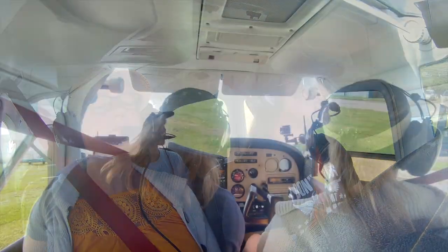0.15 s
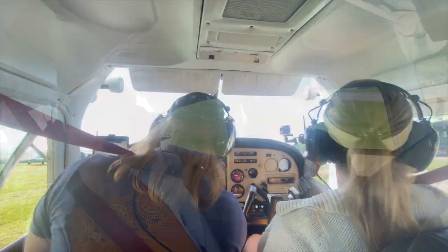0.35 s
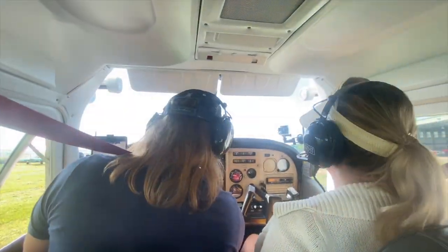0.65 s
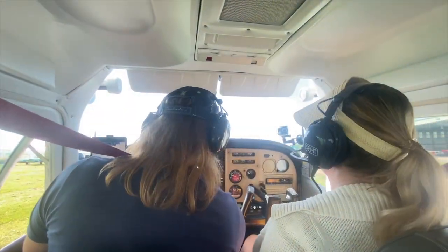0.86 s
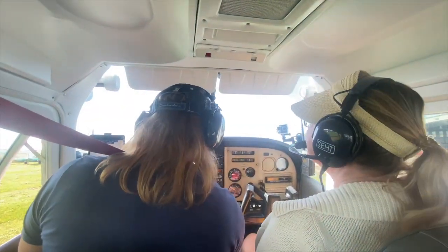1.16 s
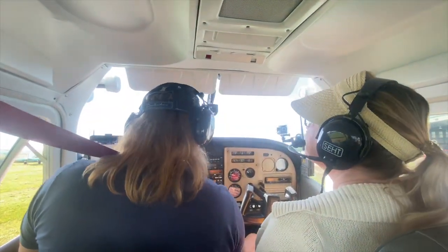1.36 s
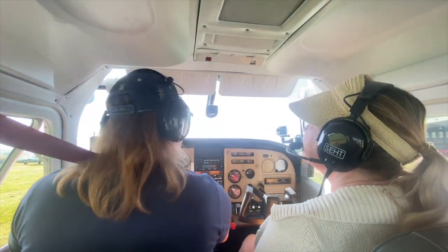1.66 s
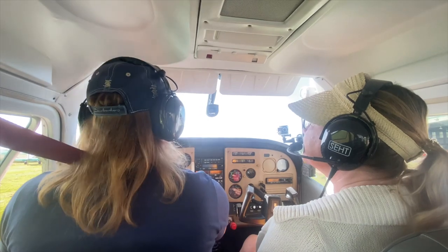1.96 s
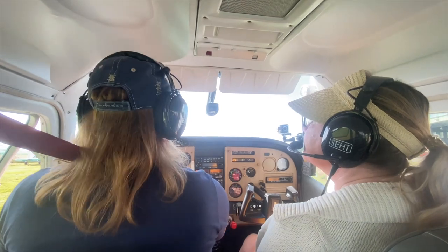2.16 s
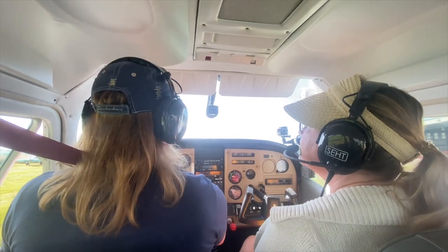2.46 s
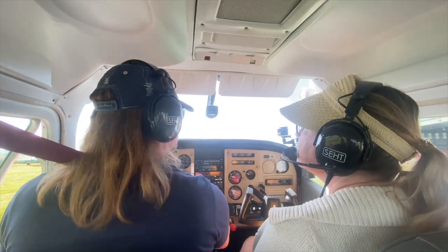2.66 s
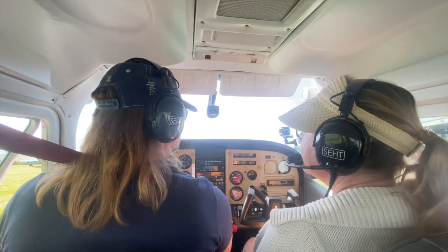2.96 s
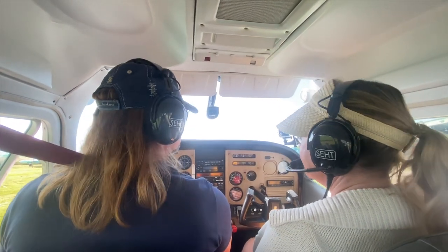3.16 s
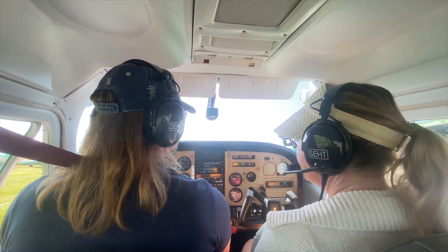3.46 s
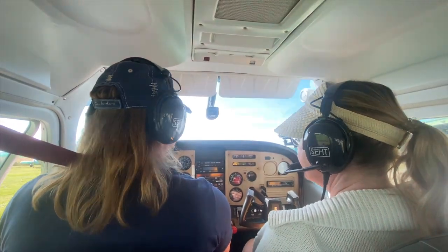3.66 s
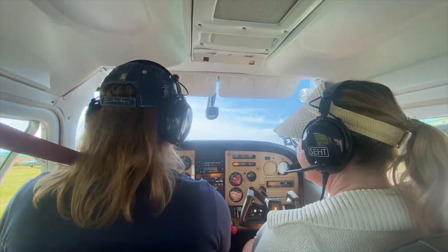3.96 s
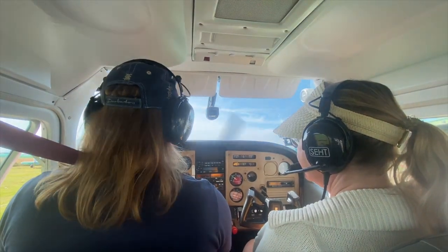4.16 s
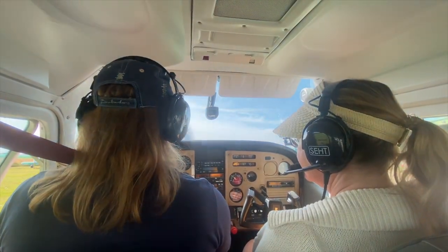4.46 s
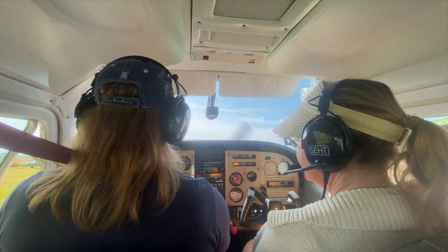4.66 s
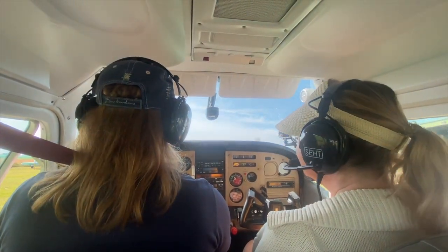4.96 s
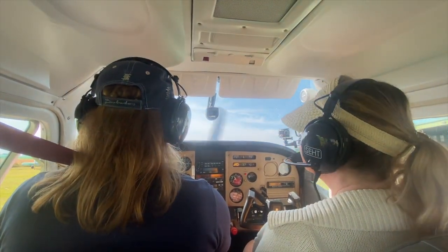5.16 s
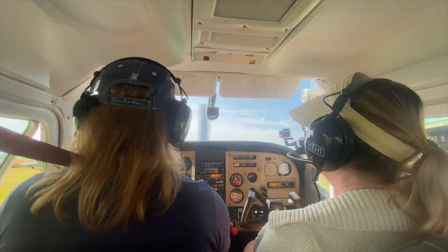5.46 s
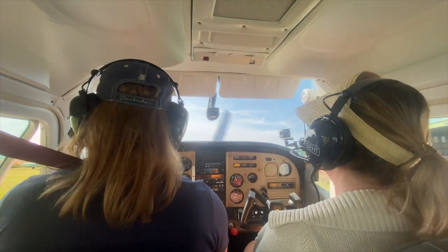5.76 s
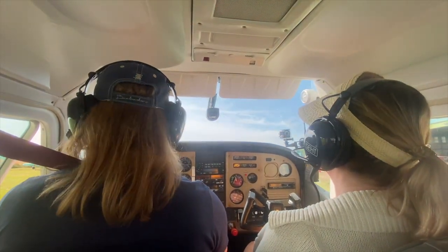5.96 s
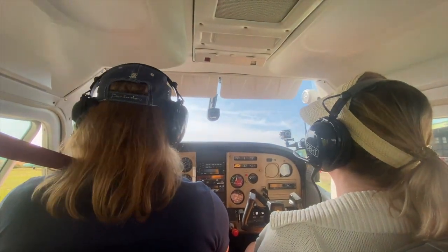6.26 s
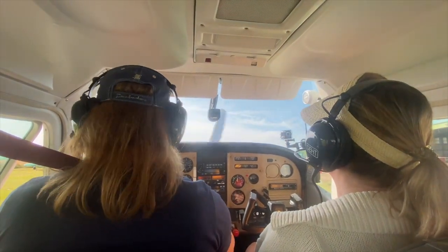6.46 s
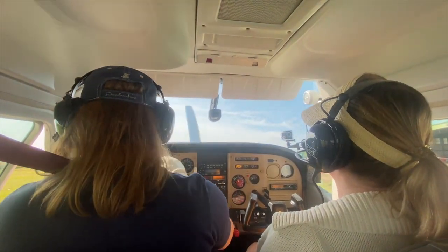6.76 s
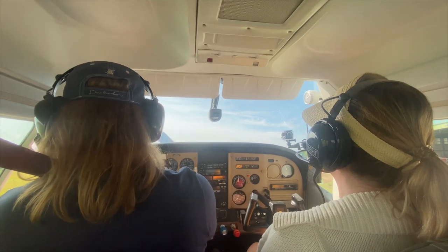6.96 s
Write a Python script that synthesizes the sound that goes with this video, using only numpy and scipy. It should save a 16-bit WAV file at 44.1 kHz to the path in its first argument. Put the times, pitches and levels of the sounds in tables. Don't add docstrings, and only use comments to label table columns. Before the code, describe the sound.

Inside a small aircraft cabin, a six-cylinder piston engine drones low and full, with exhaust buzz and airy roar. After under two seconds its fuel is cut: the pitch slides down, the roar dies and separate chuffs emerge. Linkages click, and the last compressions thump and shake the loose trim until it is almost still. Close stereo microphones at the back, slightly stronger on the left.

```python
import sys
import numpy as np
from scipy import signal
from scipy.io import wavfile
from scipy.ndimage import uniform_filter1d

SR = 44100
rng = np.random.default_rng(int(sys.argv[2]) if len(sys.argv) > 2 else 0)


def invert_db(x):
    u = np.asarray(x, float) / 20
    return 10 ** u


def wrap_up_sound(samples):
    columns = np.atleast_2d(samples).T
    tamed = np.clip(columns, -1, 1)
    steps = np.round(tamed * 32767).astype(np.int16)
    wavfile.write(sys.argv[1], SR, steps)


N = 313551
TIME = np.arange(N) / SR
RUN_HZ = 67.05
SETTLED_S = 2.91
OPENING_DB, OPENING_S = -10.5, 0.2

# start_s, length_s, level_db
KICKS = [
    (5.16, 0.13, -24.5),
    (5.345, 0.065, -22),
    (5.47, 0.14, -22.5),
    (5.66, 0.27, -20),
    (5.91, 0.082, -23.5),
    (6.065, 0.29, -20.5),
    (6.44, 0.025, -26),
    (6.53, 0.045, -28),
    (6.625, 0.022, -31),
    (6.67, 0.077, -29),
]


def in_time(rows):
    s, *columns = np.transpose(rows)
    return [np.interp(TIME, s, c) for c in columns]


def at_hz(points, hz):
    table_hz, values = np.transpose(points)
    return np.interp(np.log(hz), np.log(table_hz), values)


def ramp(start_s, length_s):
    return np.clip((TIME - start_s) / length_s, 0, 1)


def swells(rows, edge_s, sag_db_per_s):
    heights = []
    for s, length_s, db in rows:
        sagging = invert_db(db - sag_db_per_s * (TIME - s))
        heights.append(sagging * ramp(s - edge_s, edge_s) * (1 - ramp(s + length_s, edge_s)))
    return np.max(heights, axis=0)


def rms_one(x):
    return x / np.sqrt(np.mean(x ** 2) + 1e-20)


def drift(rate_hz):
    r = np.exp(-80 * np.pi * rate_hz / SR)
    slow = signal.lfilter([1], [1, -2 * r, r * r], rng.standard_normal(N // 40 + 2002))[2000:]
    return np.interp(np.arange(N) / 40, np.arange(len(slow)), rms_one(slow))


def resonance(x, hz, width_hz):
    r = np.exp(-np.pi * max(width_hz, .5) / SR)
    zeros = np.array([1, 0, -1]) * (1 - r * r) / 2
    return signal.lfilter(zeros, [1, -2 * r * np.cos(2 * np.pi * hz / SR), r * r], x)


def pair(near, far, hz):
    # pitch_hz, level_db
    left_db = [(60, -1), (110, -.5), (200, 1), (380, -.5), (600, 3), (790, 2.5), (810, 9), (880, 9),
               (930, 2.5), (1000, 2), (1250, 3), (1580, 2.5), (2200, 1.2), (3200, 2.5), (5000, 1),
               (8120, -3), (15000, -2)]
    # pitch_hz, delay_samples
    lag = [(100, 20), (160, 6), (250, 10), (320, 20), (800, 19), (875, 26), (940, 43), (1000, 34),
           (1080, 35), (1145, 37), (1200, 13), (1280, 8), (1350, 12), (1550, 14), (1700, 16), (2000, 15),
           (2500, 17), (6500, 19), (7500, 0)]
    tilt = invert_db(at_hz(left_db, hz) / 2)
    return np.array([near * tilt, np.roll(far, round(at_hz(lag, hz))) / tilt])


def speed():
    # time_s, firing_hz
    firing = [(1.65, 67.05), (1.8, 64.2), (2.0, 59.7), (2.2, 55.1), (2.4, 50.8), (2.6, 46.8), (2.8, 43.8),
              (3.0, 41.0), (3.2, 38.7), (3.4, 36.4), (3.8, 31.4), (4.2, 26.8), (4.6, 22.85), (5.0, 19.4),
              (5.5, 15.5), (7.2, 4.5)]
    return uniform_filter1d(in_time(firing)[0], size=6000, mode="nearest")


def pressure_pulses(firing_hz, phase):
    # pitch_hz, level_db
    cabin = [(28, -23.5), (62, -1), (75, -1.5), (90, 2), (110, -9), (126, -8), (165, -24.5), (270, -22)]
    # pitch_hz, turn_rad
    cabin_turn = [(82, 0), (108, 2.1), (140, 2.8)]
    # burning_db, starving_db, settled_db
    orders = [
        (-3.5, 1, -10),
        (2.5, 0.05, 0),
        (5, -6, 4),
        (-14.5, -4, -1.5),
        (-32, -15, -3),
    ]
    suction_turn_rad = -2.1
    starved, settled = ramp(1.83 - .04, .08), ramp(SETTLED_S - .05, .1)
    misfire_db = -7 * np.exp(-((TIME - 1.856) / 0.055) ** 2)
    pulse_db = -9 + 10 * np.log2(firing_hz / RUN_HZ) + misfire_db + OPENING_DB * np.exp(-TIME / OPENING_S)
    out = 0
    for k, (burning_db, starving_db, settled_db) in enumerate(orders, 1):
        state_db = burning_db + (starving_db - burning_db) * starved + (settled_db - starving_db) * settled
        level_db = pulse_db + at_hz(cabin, k * firing_hz) + state_db
        turn = settled * at_hz(cabin_turn, k * firing_hz) + (k == 1) * suction_turn_rad * starved
        out = out + invert_db(level_db + 4.5 + 0.6 * drift(45.0)) * np.cos(k * (phase + np.pi / 2) + turn)
    return out


def uneven_cylinders(burn_db, phase):
    # order_of_crank, level_db
    uneven = [(1, -48), (2, -36), (4, -32), (5, -30), (7, -28), (8, -40), (10, -42), (11, -42)]
    return sum(invert_db(burn_db - burn_db[SR] + db + 3 + 2 * drift(4.0)) * np.cos(k * phase / 3 + 6 * rng.random())
               for k, db in uneven)


def pumping(firing_hz, phase):
    # pitch_hz, level_db
    coast = [(60, -14), (100, -1), (135, -8), (165, -22), (200, -20), (230, -10), (265, -18), (400, -30)]
    pumping_db = np.interp(TIME, [1.7, 2.2, 3.3, 4.2, 5.0], [-54, -28, -17.5, -46.0, -21.5])
    out = 0
    for k in range(6, 13):
        level_db = pumping_db + at_hz(coast, k * firing_hz) - 1.27 * k + 3.7 * drift(7.0)
        out = out + invert_db(level_db) * np.cos(k * (phase + np.pi / 2))
    return out


def exhaust(burn_db, firing_hz, phase):
    # multiple_of_firing, level_db
    pipe = [(5, -39), (6, -38), (7, -37), (8, -39), (8.7, -27), (9, -37), (10, -35), (11, -35), (12, -36),
            (12.5, -38), (13, -36), (14, -36), (15, -38), (16, -35), (16.3, -30), (17, -37), (18, -31),
            (19, -34), (20, -39), (21, -38), (22, -43), (23, -45), (24, -40), (26, -45)]
    starves_db = np.interp(TIME, [1.65, 1.85, 2.1, 2.6], [-2.0, -1.0, -3.5, -7.5]) + 1.6 * drift(3.5)
    out = 0
    for k in range(5, 27):
        colour_db = at_hz(pipe, k * firing_hz / RUN_HZ)
        opening_cut_db = 10 * (k < 12 and k != 10) + 7 * (16 < k < 23) - 6 * (k > 22)
        level_db = burn_db - burn_db[SR] + starves_db + colour_db + 5.2 + 2.2 * drift(9.0)
        level = invert_db(level_db - opening_cut_db * np.exp(-TIME / .3))
        start = (.45 if k > 13 else 1.6) * rng.standard_normal()
        turn = .15 * rng.standard_normal()
        out = out + pair(level * np.cos(k * phase + start), level * np.cos(k * phase + start + turn), 67 * k)
    return out


def engine(burn_db, firing_hz, phase):
    low = pressure_pulses(firing_hz, phase) + uneven_cylinders(burn_db, phase) + pumping(firing_hz, phase)
    low = -low * np.clip((5.5 - TIME) / .3, 0, 1)
    sway = -0.02 + 0.016 * drift(2.4)
    return pair(low * (1 + sway), low * (1 - sway), 100) + exhaust(burn_db, firing_hz, phase)


def shudder(opening_db):
    # pitch_hz, width_hz, level_db
    modes = [(34, 16, -12), (63.8, 4.4, 3), (82.3, 5.6, 1), (85.3, 22, -1), (122.8, 12.4, -6.5),
             (139.4, 24.4, -12.5)]
    # time_s, level_db
    shake = [(1.9, -18), (2.2, -25), (3.6, -28), (4.9, -30), (5.3, -35), (6.4, -35), (7.1, -38)]
    # start_s, length_s, level_db
    lurches = [
        (1.63, 0.21, -14.5),
        (2.74, 0.74, -15.5),
    ]
    (level_db,), white = in_time(shake), rng.standard_normal((2, N))
    booms = sum((-1) ** k * invert_db(db) * resonance(white, hz, width) for k, (hz, width, db) in enumerate(modes))
    booms = signal.sosfilt(signal.butter(2, [20, 150], "band", fs=SR, output="sos"), booms)
    booms = booms / uniform_filter1d(booms ** 2, size=3500) ** .3
    jolts = np.maximum(swells(lurches, 0.095, 3), swells(KICKS, 0.049, 12))
    mid, side = np.maximum(invert_db(level_db + opening_db), jolts) * rms_one(booms)
    return pair(mid + .26 * side, mid - .26 * side, 70)


def chuffs(phase):
    firing = np.floor(phase / (2 * np.pi) + .5).astype(int)
    chuff = np.exp(2.5 * np.cos(phase)) * invert_db(1.4 * rng.standard_normal(600)[firing])
    return (chuff / chuff.mean() - 1) * .7


def trim_rustle():
    # time_s, level_db
    rustle = [
        (2.6, -41),
        (3.5, -66),
        (5.05, -43),
        (5.2, -38.5),
        (6.5, -39.5),
        (6.84, -40.5),
        (6.92, -50),
    ]
    kicks = uniform_filter1d(swells(KICKS, 0.12, 4.4), size=1500) / invert_db(-17.5)
    kick_share = 0.4
    return in_time(rustle)[0] + 20 * kick_share * np.log10(kicks + 0.32) * ramp(4.86, .15)


def trim_crackle():
    per_s, decay_s, level_db = 110, .004, 1.0
    ticks = (rng.random(N) < per_s / SR) * np.minimum(rng.exponential(1, N), 2.5)
    return invert_db(level_db) * signal.lfilter([1], [1, -np.exp(-1 / (decay_s * SR))], ticks + 1e-18)


def click_bursts(hz):
    # start_s, peak_db, ring_hz, bright_share_db
    clicks = [(2.6304, -32.5, 1800, -8.5), (3.352, -25.5, 1660, -29), (4.2654, -52, 1420, -8),
              (4.603, -21, 1780, -33), (4.612, -37, 1500, -40), (4.815, -38.5, 1900, -40),
              (4.7804, -48, 1790, -24), (4.879, -29, 1510, -37), (4.895, -37, 1100, -40),
              (5.124, -36, 5000, -8), (5.202, -31.5, 2500, -23), (5.300, -37, 4000, -15),
              (5.3284, -35, 5000, -10), (5.406, -24.5, 1840, -16), (5.519, -42, 2500, -20),
              (5.6306, -41, 4000, -10), (5.754, -27, 2500, -15), (5.762, -38, 1500, -25),
              (5.822, -26, 2800, -14), (5.829, -34, 2000, -25), (5.838, -34, 1200, -30),
              (5.885, -31, 2500, -20), (5.9634, -36, 4200, -26), (6.0034, -42, 5000, -3),
              (6.052, -35, 3000, -10.5), (6.0934, -38.5, 4500, -8), (6.153, -34, 2460, -22),
              (6.167, -35, 3000, -21), (6.319, -32, 4500, -11), (6.395, -43, 4000, -13),
              (6.482, -27.5, 4040, -15.5), (6.553, -32.5, 4200, -16), (6.631, -33.5, 4200, -9.5),
              (6.675, -35, 1700, -16), (6.706, -45, 5000, -8), (6.816, -33.5, 4198, -12),
              (6.83, -37.5, 3850, -14), (6.94, -41, 1900, -28), (6.984, -31, 3820, -14),
              (7.0614, -38, 2400, -16)]
    s, peak_db, ring_hz, bright_db = np.transpose(clicks)
    lift_db = 7.5 * np.exp(-(np.log2(hz / ring_hz) / 0.52) ** 2)
    part_db = 8.5 + bright_db if hz > 6500 else -13 + lift_db
    hits = np.full(N, 1e-18)
    hits[(s * SR).astype(int)] = invert_db(peak_db + part_db)
    hits = uniform_filter1d(hits, size=130, origin=-64)
    power = 0
    for db, t60_s in ((0, .05), (-15, 0.17)):
        ringing = signal.lfilter([1], [1, -invert_db(-60 / (t60_s * SR))], hits)
        power = power + (invert_db(db) * ringing) ** 2
    return power


def noises(burn_db, air_db, trim_db, phase):
    # pitch_hz, density_db
    roar = [(140, 1), (200, -8), (300, -4), (380, -8.5), (500, -9), (630, -14), (790, -9), (950, -8),
            (1300, -8), (1550, -4), (2000, -14), (2500, -19.5), (3200, -18.5), (6500, -26.5), (10300, -31),
            (12500, -40)]
    # pitch_hz, density_db
    airflow = [(140, -2.5), (200, -9.5), (280, -10), (380, -8.5), (500, -3.5), (620, -5), (800, -9.5),
               (1250, -13), (1550, -10.5), (2300, -28.5), (3200, -25), (6500, -40.5), (10000, -35.5),
               (12500, -50)]
    # pitch_hz, density_db
    trim = [(140, 4.5), (220, 1), (420, -3), (800, -7.5), (1100, -10.5), (1700, -12.5), (2600, -22),
            (3500, -25.5), (4800, -26), (6500, -38), (9500, -34), (12500, -50)]
    # pitch_hz, density_db
    crack = [(140, 10), (500, 13), (1100, 10.5), (1600, 13.5), (2400, -2), (3500, 3.5), (6000, -9),
             (12500, -15)]
    # pitch_hz, depth_0_1
    burning_throb = [(140, 0.2), (600, 0.05), (1000, 0.22), (1500, 0.25), (2000, 0.27), (3200, 0.24),
                     (5000, 0.06), (12500, 0.15)]
    # pitch_hz, depth_0_1
    coast_throb = [(140, 0.15), (700, 0.08), (1000, 0.4), (1400, 0.4), (2000, 0.13), (5000, 0.09),
                   (12500, 0.09)]
    # pitch_hz, share_0_1
    likeness = [(140, .78), (250, .62), (450, .72), (650, .55), (800, .75), (1000, .5), (1250, .55),
                (1600, .88), (2000, .75), (2500, .45), (3500, .5), (6500, .42), (9000, .6), (12500, .6)]
    beat, crackle = chuffs(phase), trim_crackle()
    lumps = invert_db(2 * (1.0 * drift(14.0) + 1.2 * drift(60.0)))
    burn_power, air_power, trim_power = invert_db(2 * burn_db), invert_db(2 * air_db), invert_db(2 * trim_db) * lumps
    unfuelled = ramp(1.70, 0.66)
    throb_share = (1 - 0.4 * ramp(SETTLED_S, 0.6)) * (1 + .7 * np.exp(-TIME / 0.36))
    edges_hz = 140 * 2 ** np.arange(0, 6.7, 1 / 3)
    white, out = rng.standard_normal((2, 2, N)), 0
    for k, (low, high) in enumerate(zip(edges_hz, edges_hz[1:])):
        hz = np.sqrt(low * high)
        band = signal.butter(2, [low, high], "band", fs=SR, output="sos")
        mid, side = signal.sosfilt(band, white[k % 2])
        steady = burn_power * invert_db(2 * (at_hz(roar, hz) + 21.5))
        steady = steady + air_power * invert_db(2 * (at_hz(airflow, hz) + 21.5))
        patchy_db = 1.5 * drift(15.0)
        trim_colour = invert_db(2 * (at_hz(trim, hz) + 21.5 + patchy_db))
        steady = steady + trim_power * (0.82 + crackle * (hz > 900)) * trim_colour
        clicks = click_bursts(hz) * invert_db(2 * at_hz(crack, hz))
        burning, coasting = at_hz(burning_throb, hz), at_hz(coast_throb, hz)
        depth = (burning + (coasting - burning) * unfuelled) * throb_share
        throb = np.maximum(1 + depth * beat * (TIME < 5.4), .1)
        gain = np.sqrt(steady * throb ** 2 * invert_db(2 * 0.84 * drift(11.4)) + 10.2 * clicks)
        alike = np.clip(at_hz(likeness, hz), 0, 1) * (1 - .55 * (hz > 380) * ramp(5.15, 0.26))
        shared, own = np.sqrt((1 + alike) / 2) * mid, np.sqrt((1 - alike) / 2) * side
        out = out + pair(gain * (shared + own), gain * (shared - own), hz)
    return signal.sosfilt(signal.cheby2(16, 60, 12800, fs=SR, output="sos"), out)


def top_hiss(burn_db):
    level = invert_db(burn_db - 20 + 3.0 * drift(9.8)) + invert_db(-22.0) * np.sqrt(click_bursts(9000))
    air = rng.standard_normal(N) * level
    band = signal.butter(4, [14450, 15250], "band", fs=SR, output="sos")
    return signal.sosfilt(band, [air, np.roll(air, 1)])


def whines(air_db):
    # pitch_hz, width_hz, level_db, start_s, stop_s, share_of_airflow_fall
    tones = [
        (622, 40, -42, 0.1, 5.3, .6),
        (626, 7, -39, .1, 1.8, 0),
        (505, 9, -45, .2, 1.7, 0),
        (5720, 150, -67, 0.1, 5.6, .9),
        (1157, 14, -55, 6.82, 7.3, 0),
        (1082, 6, -60, 6.82, 7.3, 0),
        (1238, 10, -59, 6.82, 7.3, 0),
        (79, 8, -43, 6.85, 7.3, 0),
    ]
    out = 0
    for hz, width, db, start, stop, follows in tones:
        tone = rms_one(resonance(resonance(rng.standard_normal(N), hz, width), hz, width))
        evenness = .4 if width < 15 else 0
        tone = tone / uniform_filter1d(tone ** 2, size=4000) ** evenness
        level = invert_db(db + follows * (air_db - air_db[2 * SR] + 2 * drift(5.0)))
        tone = level * tone * np.clip(np.minimum(TIME - start, stop - TIME) / .08, 0, 1)
        out = out + pair(tone, tone, 9000)
    return out


def gyro():
    # time_s, level_db
    level = [(2.0, -68), (3.3, -71), (4.2, -72), (4.7, -67), (5.1, -71), (5.8, -71)]
    hz = 9286 - 36 * np.clip(TIME - 4.2, 0, None) + 3 * drift(4.0)
    tone = invert_db(in_time(level)[0] + 3 + 1.5 * drift(8.0)) * np.sin(2 * np.pi * np.cumsum(hz) / SR)
    tone = tone * ramp(1.9, .1) * (1 - ramp(5.85, .05))
    return pair(tone, tone, 9000)


def panel_pings():
    # start_s, pitch_hz, level_db
    pings = [(2.92, 426, -25), (4.572, 1103, -41), (4.606, 235, -33), (4.783, 643, -28.5),
             (4.795, 716, -41), (5.405, 1595, -42), (5.406, 2250, -43), (6.06, 905, -35), (6.315, 850, -40),
             (6.544, 885, -38), (6.58, 640, -44), (6.671, 870, -32)]
    out = 0
    for s, hz, db in pings:
        age = np.clip(TIME - s, 0, None) / .006
        tone = invert_db(db) * np.sin(2 * np.pi * hz * TIME) * age * np.exp(1 - age)
        out = out + pair(tone, tone, 9000)
    return out


def scene():
    firing_hz = speed()
    phase = 1.9 + 2 * np.pi * np.cumsum(firing_hz) / SR + .05 * drift(5.0)
    opening_db = 0.49 * OPENING_DB * np.exp(-TIME / (1.33 * OPENING_S))
    burn_db = -24 + 23 * np.log2(firing_hz / RUN_HZ) + opening_db
    air_full_hz, air_least_db = 42.2, -50
    air_db = -31 + 10.5 * np.log2(np.minimum(firing_hz / air_full_hz, 1))
    air_db = np.maximum(air_db, air_least_db) + 1.3 * opening_db
    out = engine(burn_db, firing_hz, phase) + shudder(opening_db)
    out = out + noises(burn_db, air_db, trim_rustle(), phase) + top_hiss(burn_db)
    return out + whines(air_db) + gyro() + panel_pings()


def band_limit(x):
    return signal.sosfilt(signal.butter(12, 15800, fs=SR, output="sos"), x)


def record(dry):
    # pitch_hz, width_hz, level_db
    case = [(372, 40, -4), (565, 40, -5), (850, 35, -4), (1455, 60, -5), (1680, 260, -5), (3750, 300, -2.5),
            (5350, 280, -7), (5720, 180, 5), (6150, 250, -8), (6450, 220, 4), (7680, 380, -15),
            (8500, 900, -2.5), (9500, 500, -4), (10250, 700, 2.5), (11100, 700, -4)]
    # pitch_hz, width_hz, level_db
    left_dips = [(960, 170, -7)]
    # pitch_hz, width_hz, level_db
    right_dips = [(845, 260, -7), (1265, 220, -8)]
    sides = list(dry)
    for k, dips in enumerate((left_dips, right_dips)):
        for hz, width, db in dips + case:
            sides[k] = sides[k] - (1 - invert_db(db)) * resonance(sides[k], hz, width)
    return band_limit(1.144 * np.tanh(np.array(sides) / 1.138))


dry = scene()
out = record(dry)
wrap_up_sound(out)
```